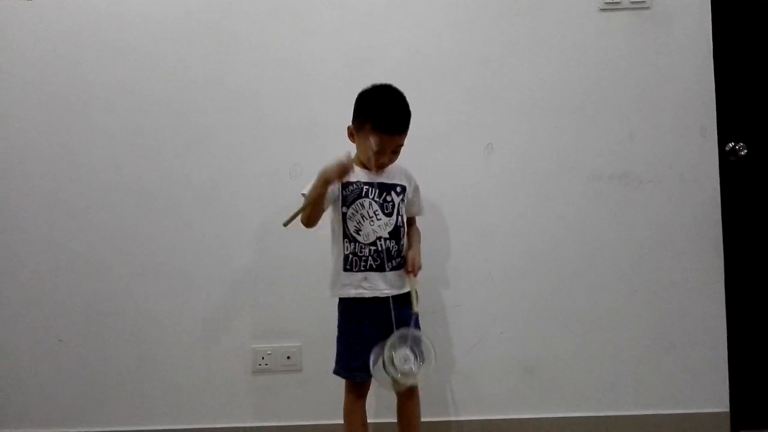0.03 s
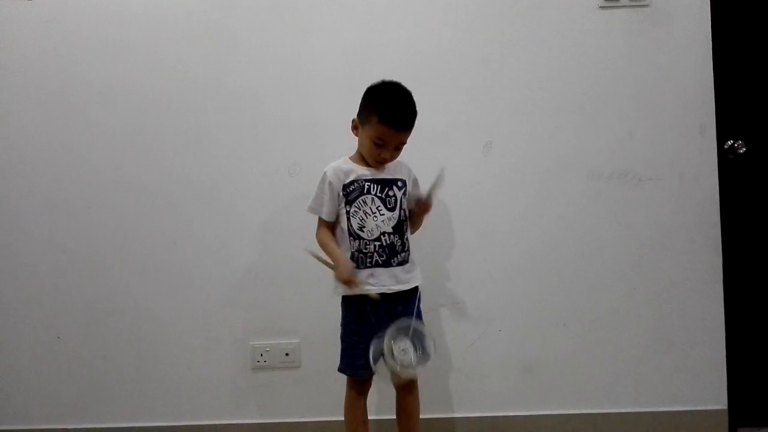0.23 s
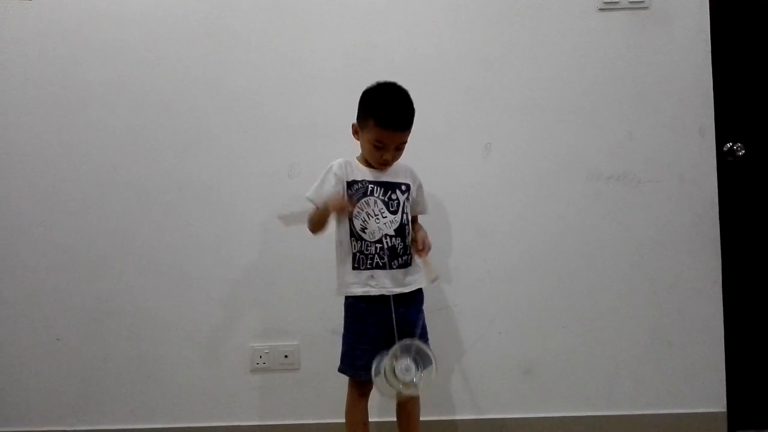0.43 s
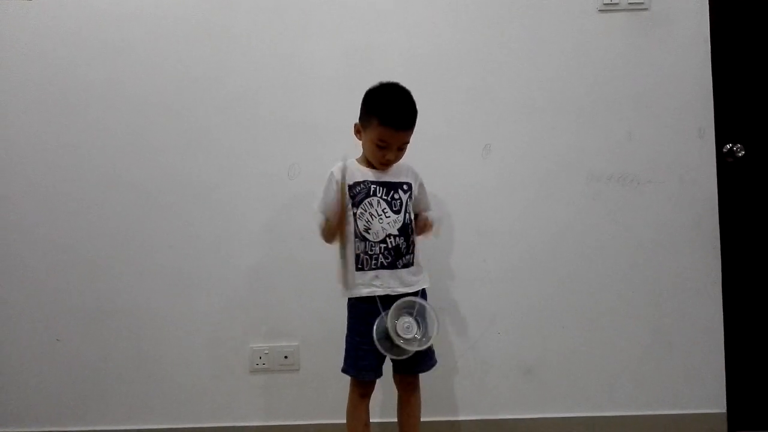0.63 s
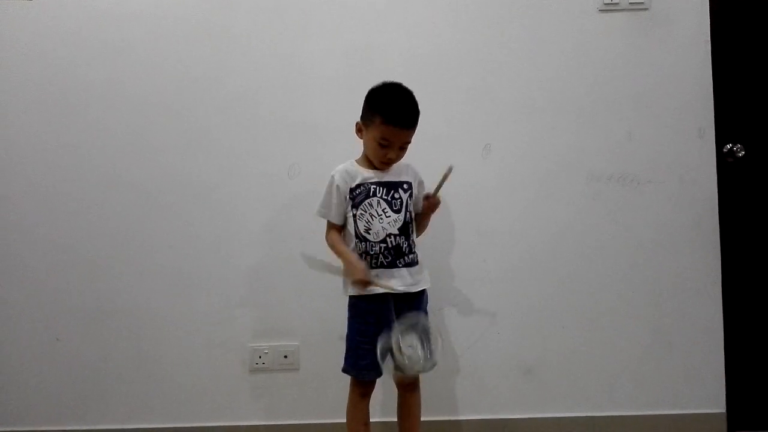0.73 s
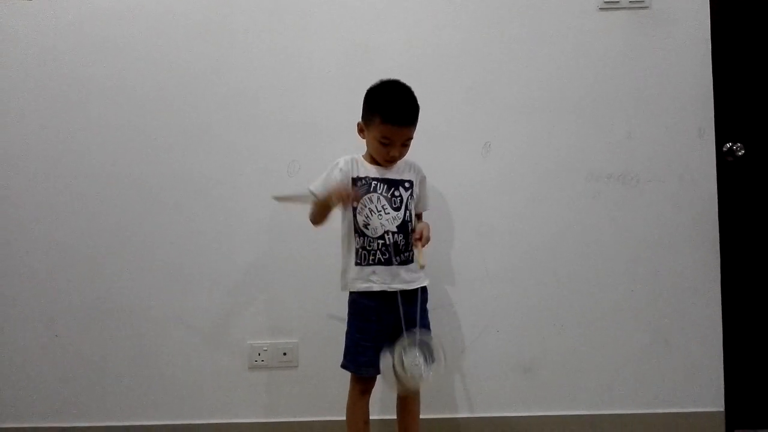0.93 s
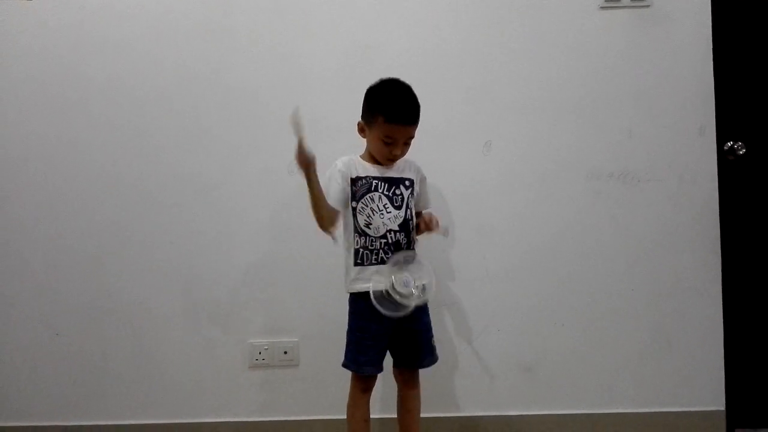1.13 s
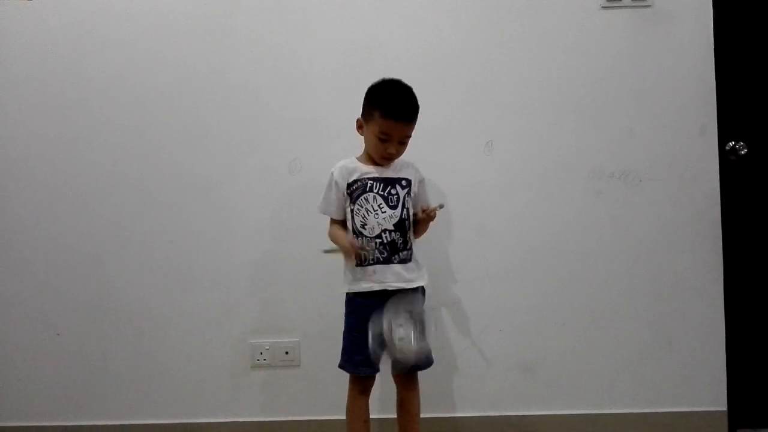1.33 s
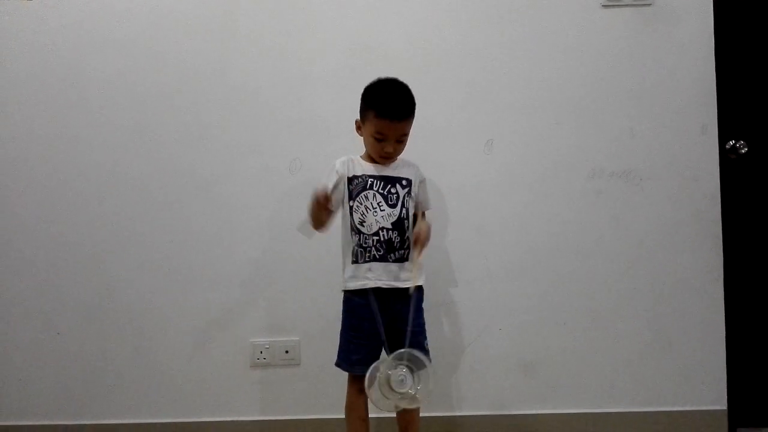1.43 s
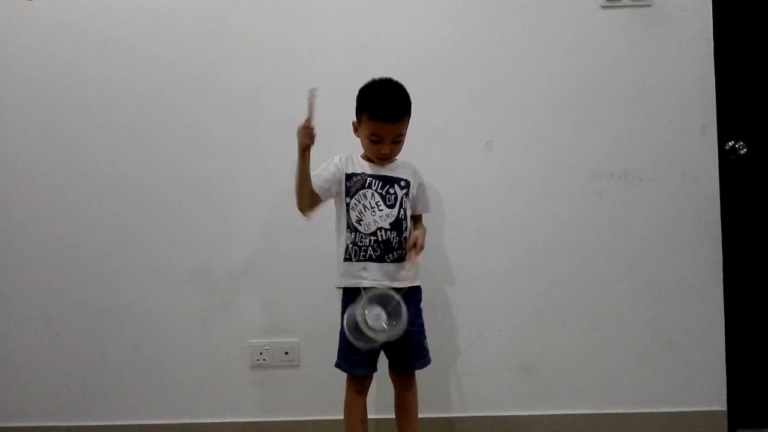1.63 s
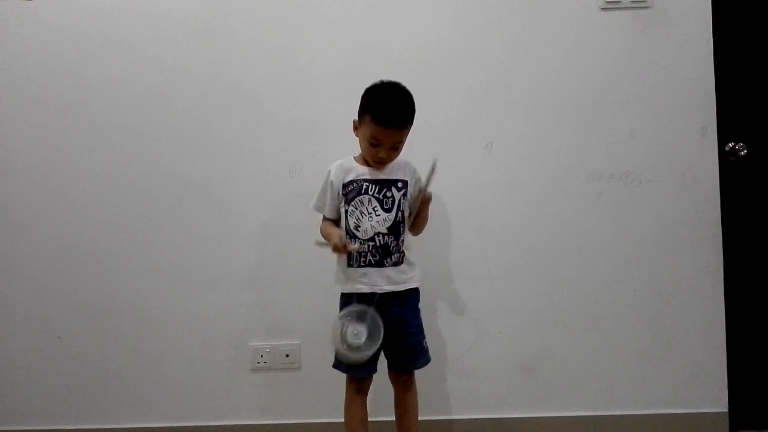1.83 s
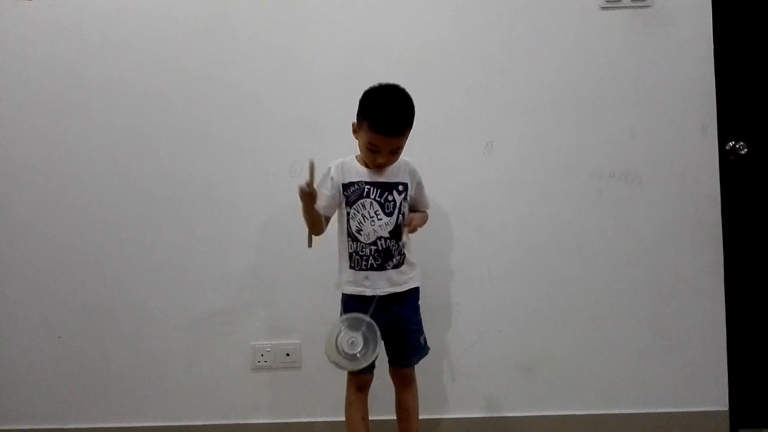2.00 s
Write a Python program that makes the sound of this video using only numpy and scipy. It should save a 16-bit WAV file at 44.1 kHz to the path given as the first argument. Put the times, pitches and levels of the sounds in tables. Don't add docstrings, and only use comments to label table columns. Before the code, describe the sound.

A diabolo spool toy squeals and roars on its string, with one loud stick crack

```python
import sys
import numpy as np
from scipy import signal
from scipy.fft import rfft, irfft
from scipy.io import wavfile
from scipy.ndimage import uniform_filter1d

SR = 44100
rng = np.random.default_rng(int(sys.argv[2]) if len(sys.argv) > 2 else 0)


def wav_out(sig):
    wavfile.write(sys.argv[1], SR, np.round(np.clip(np.atleast_2d(sig).T, -1, 1) * 32767).astype(np.int16))


def boost(x):
    u = np.asarray(x, float) / 20
    return 10 ** u


N = 91066

# pitch in Hz, width in Hz, level in dB.
CUP_TONES = [(970, 260, 3.5), (1098, 370, -4.5), (1255, 124, 0.5), (1600, 400, -9.5)]


def rms_one(x):
    return x / np.sqrt(np.mean(x ** 2) + 1e-20)


def at_hz(points, hz):
    table_hz, values = np.array(points).T
    return np.interp(np.log(hz + 1), np.log(table_hz), values)


def colour(x, points, share=1):
    hz = np.arange(N // 2 + 1) * SR / N
    return irfft(rfft(x) * boost(share * at_hz(points, hz)), N)


def drift(rate):
    r = np.exp(-2 * np.pi * rate / SR)
    wander = signal.lfilter([1], [1, -2 * r, r * r], rng.standard_normal(N + SR))
    return rms_one(wander[SR:])


def ring(clicks, hz, t60):
    r, w = boost(-60 / (t60 * SR)), 2 * np.pi * hz / SR
    return signal.lfilter([0, np.sin(w)], [1, -2 * r * np.cos(w), r * r], clicks + 1e-18)


def resonate(x, peaks):
    out = 0
    for k, (hz, width, db) in enumerate(peaks):
        r = np.exp(-np.pi * width / SR)
        b = (1 - r * r) / 2 * np.array([1, 0, -1])
        a = [1, -2 * r * np.cos(2 * np.pi * hz / SR), r * r]
        once = signal.lfilter(b, a, x)
        out = out + (-1) ** k * boost(db) * signal.lfilter(b, a, once)
    return rms_one(out)


def click(s, db):
    return boost(db) * (np.arange(N) == int(s * SR))


def hump(start, length, peak):
    u = (np.arange(N) / SR - start) / length
    return np.sin(np.pi / 2 * np.interp(u, [0, peak, 1], [0, 1, 0]))


def slips():
    slips_per_s, spread_db = 9000, 2.0
    sizes = boost(spread_db * np.minimum(rng.exponential(1, N), 4)) * rng.choice([-1, 1], N)
    happens = rng.random(N) < slips_per_s / SR
    return sizes * happens * boost(2.1 * drift(16.7))


def strokes(rows, layers, power):
    out = 0
    for start, length, *levels in rows:
        for (sound, peak), db in zip(layers, levels):
            out = out + sound * boost(db) * hump(start, length, peak) ** power
    return out


def swish():
    # pitch in Hz, level in dB.
    swish_colour = [(3530, -16.5), (6000, -2), (6560, -9.5), (8370, 1.5), (11000, 0.5), (14000, -14)]
    noise = rms_one(colour(rng.standard_normal(N), swish_colour))
    return boost(-69) * hump(1.84, 0.54, 0.094) * noise


def string():
    # start in seconds, length in seconds, squeal, cup roar and string hiss in dB.
    pulls = [
        (-.1, 0.29, -48, -44.5, -41),
        (.4, 0.22, -47, -45, -41),
        (0.905, 0.25, -47, -49.5, -45.5),
        (1.924, 0.1, -69, -69.5, -61),
    ]
    # start in seconds, length in seconds, slide, cup and air in dB.
    returns = [
        (.18, .2, -47, -63.5, -56),
        (.64, .18, -52, -67, -56.5),
        (1.684, 0.2, -65.5, -71, -65.5),
    ]
    # pitch in Hz, width in Hz, level in dB.
    squeal_tones = [(2180, 200, -2), (2400, 230, 0), (3050, 600, -9)]
    # pitch in Hz, width in Hz, level in dB.
    slide_tones = [(2750, 500, 0), (3300, 500, 0), (3850, 550, -2), (4700, 900, -7), (2250, 500, -8)]
    # pitch in Hz, level in dB.
    hiss_colour = [(1060, -19.5), (1800, -4.5), (3400, -5), (5350, -7.5), (6300, -15), (7480, -26.5),
                   (10000, -30), (14000, -43)]
    # pitch in Hz, level in dB.
    air_colour = [(2350, -50), (4000, -10), (5060, -8), (6550, -14), (7950, -19), (14000, -43)]

    squeal = resonate(slips(), squeal_tones)
    cup = resonate(slips(), CUP_TONES)
    hiss = rms_one(colour(slips(), hiss_colour))
    slide = resonate(slips(), slide_tones)
    air = rms_one(colour(slips(), air_colour))
    pulling = strokes(pulls, [(squeal, 0.075), (cup, 0.68), (hiss, 0.4)], 0.9)
    returning = strokes(returns, [(slide, 0.65), (cup, 0.7), (air, 0.8)], 0.6)
    return pulling + returning + swish()


def crack():
    # pitch in Hz, level in dB.
    crack_colour = [(350, -85), (600, -29.5), (771, -14), (2020, -10), (2700, -2.5), (3160, -6.5),
                    (5350, -6.5), (8710, -21), (14000, -45)]
    log_gain = np.log(boost(at_hz(crack_colour, np.arange(2049) * SR / 4096)))
    fold = irfft(log_gain) * np.r_[1, 2 * np.ones(2047), 1, np.zeros(2047)]
    pulse = irfft(np.exp(rfft(fold)))
    return np.convolve(click(1.3795, -7), pulse / abs(pulse).max())[:N]


def knocks():
    # start in seconds, level in dB, pitch in Hz, width in Hz, cup level in dB.
    knock_rows = [
        (.3762, -28, 3450, 1600, -50),
        (.384, -36, 3000, 1800, -39),
        (.88, -50, 3050, 500, -70),
        (1.930, -43, 2650, 1400, -50),
    ]
    out = 0
    for s, db, hz, width, cup_db in knock_rows:
        rub = rng.standard_normal(N) + .3 * np.sin(2 * np.pi * hz * np.arange(N) / SR)
        scuff = hump(s, .006, .75) ** 2 * rub
        body = resonate(scuff, [(hz, width, 0), (1.8 * hz, 2500, -20)])
        cup = resonate(scuff, CUP_TONES)
        out = out + boost(db) * body / abs(body).max() + boost(cup_db) * cup / abs(cup).max()
    return out


def echoes(x):
    # delay in seconds, left level in dB, right level in dB.
    reflections = [(.0022, -6, -4), (.0048, -4, -5), (.009, -9, -6), (.0155, -4, -10), (.032, -7, -8)]
    ears = []
    for side in (1, 2):
        heard = 0
        for k, row in enumerate(reflections):
            delay = int(row[0] * SR) + 7 * k * side
            heard = heard + boost(row[side]) * (-1) ** (k + side) * np.roll(x, delay)
        ears.append(heard)
    return np.array(ears)


def room(x):
    # pitch in Hz, time to fade by 60 dB in seconds.
    fade_times = [(700, 0.58), (1400, 0.53), (2400, 0.49), (4000, 0.57), (8000, 0.32), (13000, 0.28)]
    t, tail = np.arange(SR) / SR, 0
    edges = 500 * 2 ** np.arange(0, 5.1, .5)
    for low, high in zip(edges, edges[1:]):
        band_pass = signal.butter(2, [low, high], "band", fs=SR, output="sos")
        band = signal.sosfilt(band_pass, rng.standard_normal((2, SR)))
        fade = boost(-60 * t / at_hz(fade_times, np.sqrt(low * high)))
        build_up = np.clip(t / .003, 0, 1)
        tail = tail + band * boost(1.5 * drift(60)[:SR]) * fade * build_up
    return signal.fftconvolve(x[None], rms_one(tail) / np.sqrt(SR), axes=1)[:, :N]


def wind():
    # time in seconds, level in dB.
    steady_air = [(0.0, -57), (0.24, -52.5), (0.41, -50), (0.91, -53.5), (1.41, -46), (1.5, -44),
                  (1.58, -42.5), (1.94, -47), (2.06, -49.5)]
    # start in seconds, peak level in dB, length in seconds.
    puffs = [(0.229, -40.5, 0.09), (0.321, -44.5, 0.068), (0.409, -42.5, .07), (0.512, -47, 0.054),
             (0.62, -43, 0.099), (0.711, -37.5, 0.043), (0.785, -44, 0.055), (1.062, -36, 0.1),
             (1.148, -38.5, 0.049), (1.317, -41, 0.049), (1.388, -39.5, 0.071), (1.48, -35.5, 0.055),
             (1.577, -51.5, 0.054), (1.65, -37, 0.057), (1.73, -39, 0.04), (1.851, -45.5, 0.11),
             (1.927, -57.5, 0.051)]
    # pitch in Hz, level in dB.
    wind_colour = [(12, -83), (20, 0.5), (108, -9.5), (195, -23.5), (343, -27), (377, -38), (500, -40.5),
                   (650, -90), (1100, -120)]
    # pitch in Hz, level in dB, time to fade by 60 dB in seconds.
    jolt_tones = [(33.5, -24, .3), (102, -32, .3), (165, -38, .2), (250, -40, .15)]

    air = colour(rng.standard_normal(N), wind_colour)
    air = rms_one(air / np.sqrt(uniform_filter1d(air ** 2, size=2200)))
    s, db = np.transpose(steady_air)
    push = boost(np.interp(np.arange(N) / SR, s, db) - 2.5)
    for start, peak_db, length in puffs:
        push = push + boost(peak_db - 6) * hump(start, length, .4)

    jolt = 0
    for k, (hz, tone_db, t60) in enumerate(jolt_tones):
        jolt = jolt + (-1) ** k * ring(click(1.004, tone_db), hz, t60)
    jolt = signal.sosfilt(signal.butter(2, 232, fs=SR, output="sos"), jolt)

    mono, lead_s = air * push + jolt, 0.00088
    time = np.arange(N)
    return np.array([np.interp(time + side * lead_s * SR / 2, time, mono) for side in (1, -1)])


def ticks():
    mains_hz, tick_hz, t60_s = 50, 4850, .004
    s = np.arange(.0095, N / SR, 1 / mains_hz)
    train = np.zeros(N)
    train[(s * SR).astype(int)] = boost(-50 + 2.0 * rng.standard_normal(len(s)))
    return ring(ring(train, tick_hz, t60_s), 1.08 * tick_hz, t60_s) / 5


def quiet_floor():
    # pitch in Hz, level in dB.
    floor_colour = [(150, -42), (250, -4.5), (687, -12), (1420, -6), (1590, -10), (2350, -7), (4090, -9),
                    (5010, -8), (14000, -35)]
    floor_db = -54.5
    hiss = boost(floor_db - 8.5) * rms_one(colour(rng.standard_normal((2, N)), floor_colour))
    hum_tones = [(256, 194, -4.5), (370, 290, -7), (905, 370, -1.5)]  # Hz, width in Hz, dB
    hum = boost(floor_db - 14) * resonate(rng.standard_normal(N), hum_tones)
    return hiss + hum


def scene():
    toy, hits, blow = string(), knocks(), crack()
    wet = room(boost(-5) * toy + boost(-3) * hits + boost(4) * blow)
    direct_band = signal.butter(2, [1200, 5500], "band", fs=SR, output="sos")
    blow = signal.sosfilt(direct_band, boost(1) * blow)
    near = boost(-1.0) * toy + hits + blow + boost(-2.0) * echoes(blow)
    far_ticks = ticks() * boost([[1.0], [-2.0]])
    return near + wet + far_ticks + quiet_floor() + wind()


def band_limit(x):
    return signal.sosfilt(signal.butter(12, 14240, fs=SR, output="sos"), x)


def record(dry):
    # pitch in Hz, left minus right in dB.
    port_colour = [(300, 0.5), (1300, 0.5), (2000, -4), (2900, -13.5), (3900, -9.5), (5000, 15),
                   (7000, 6.5), (13000, 10)]
    ports = np.array([colour(dry[0], port_colour, 0.19), colour(dry[1], port_colour, -1 / 2)])
    top_cut = signal.cheby2(12, 60, 14900, fs=SR, output="sos")
    return band_limit(signal.sosfilt(top_cut, ports))


dry = scene()
out = record(dry)
wav_out(out)
```